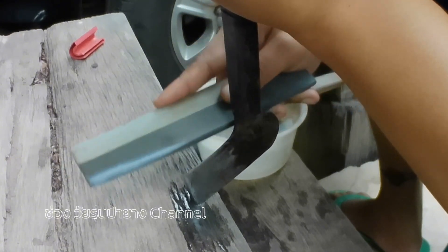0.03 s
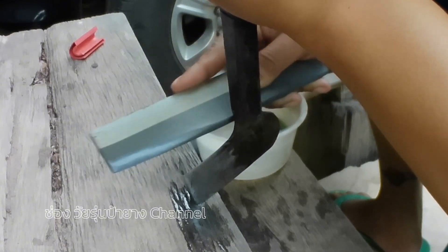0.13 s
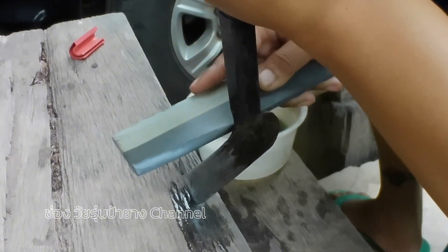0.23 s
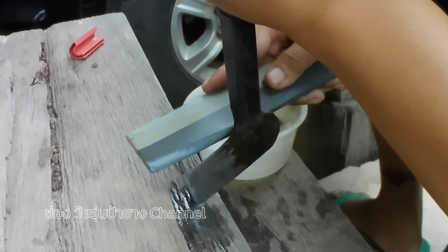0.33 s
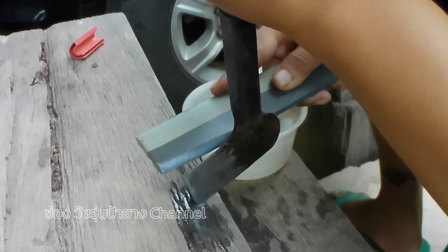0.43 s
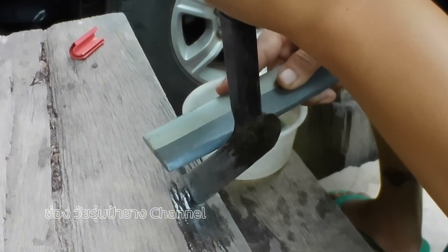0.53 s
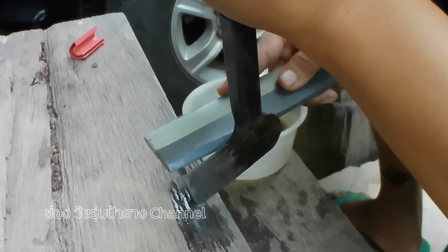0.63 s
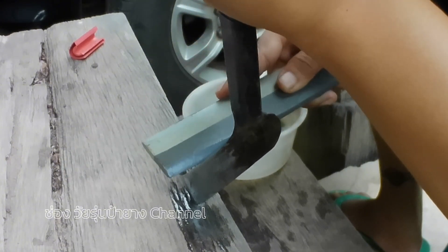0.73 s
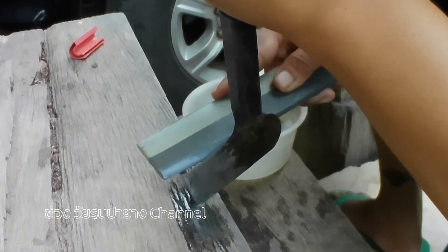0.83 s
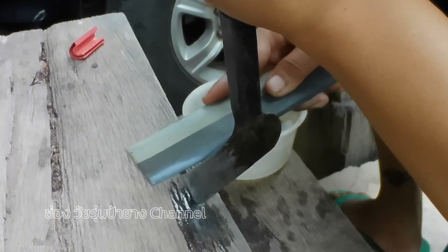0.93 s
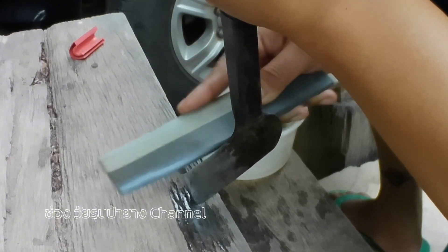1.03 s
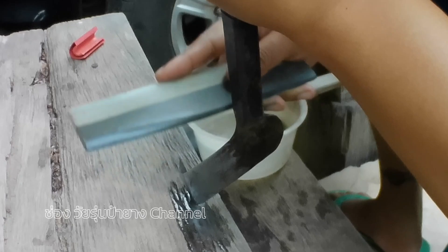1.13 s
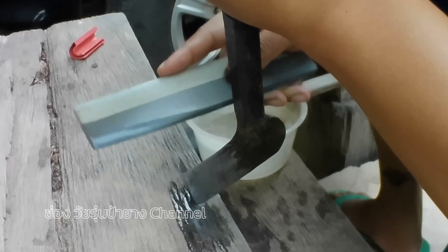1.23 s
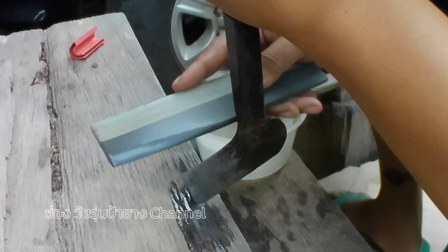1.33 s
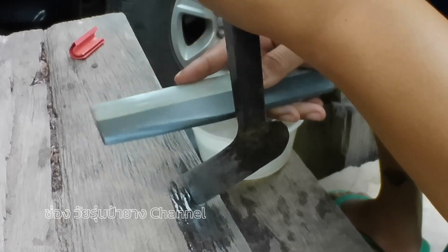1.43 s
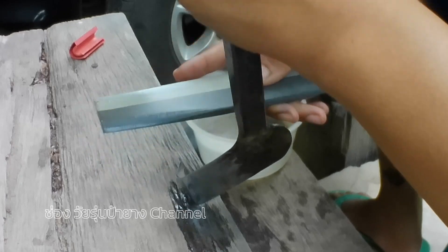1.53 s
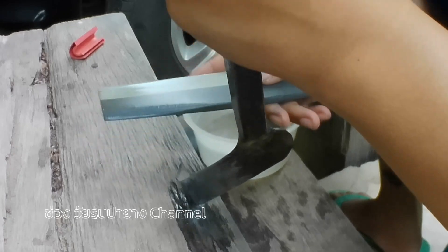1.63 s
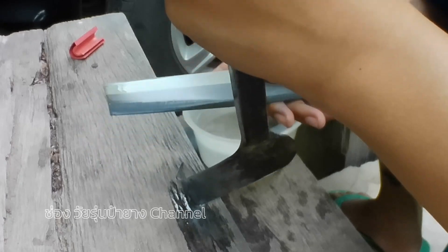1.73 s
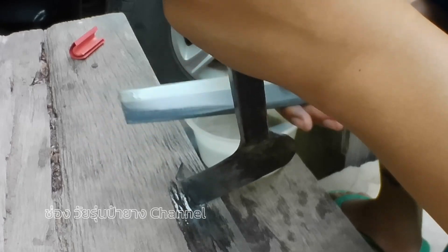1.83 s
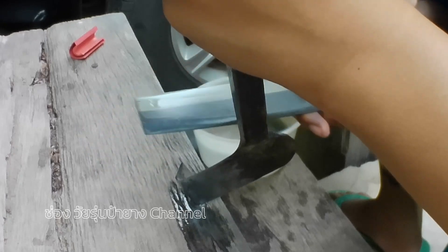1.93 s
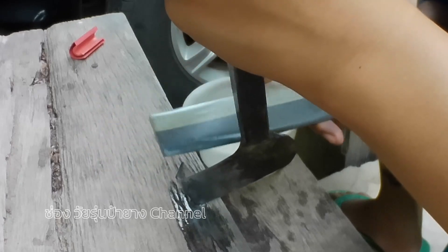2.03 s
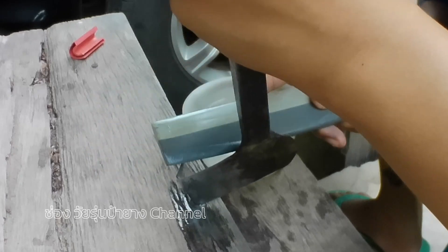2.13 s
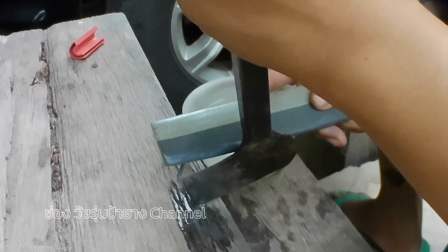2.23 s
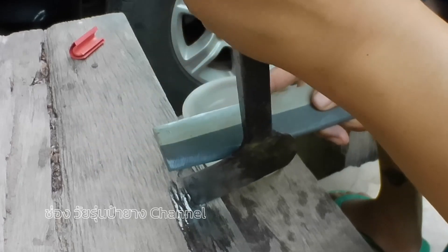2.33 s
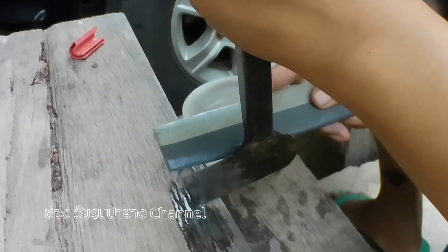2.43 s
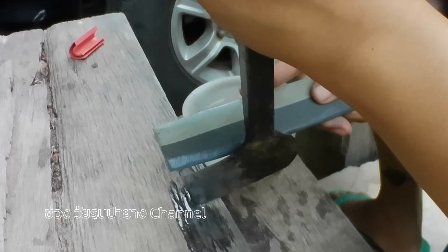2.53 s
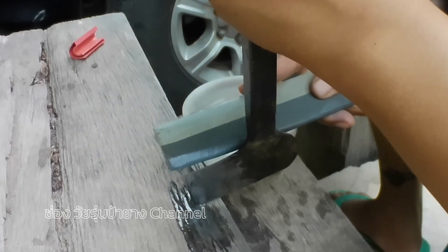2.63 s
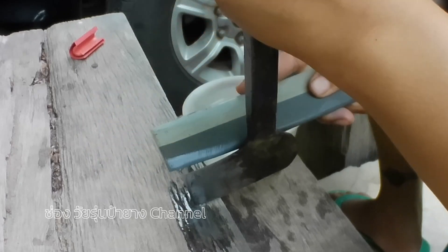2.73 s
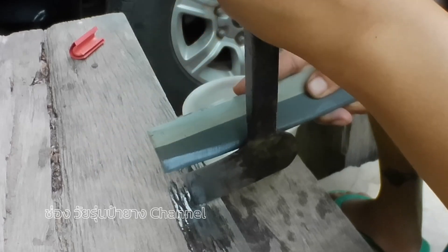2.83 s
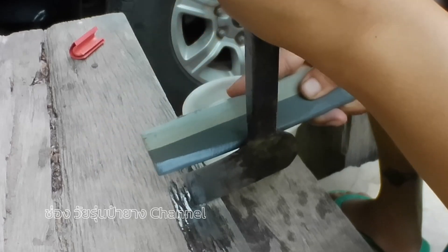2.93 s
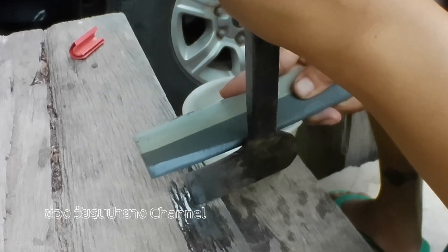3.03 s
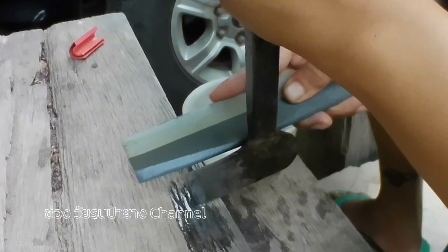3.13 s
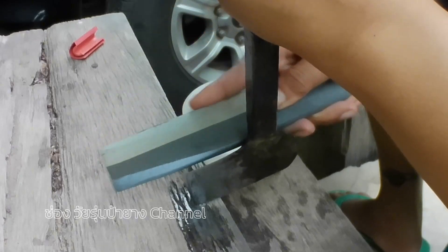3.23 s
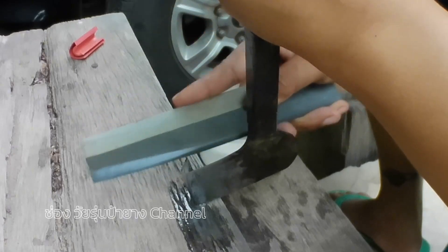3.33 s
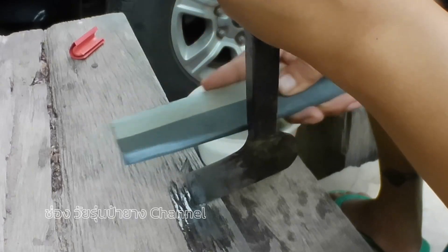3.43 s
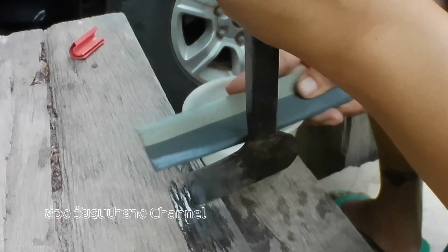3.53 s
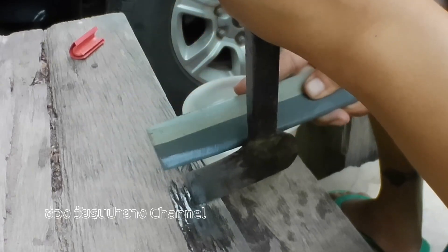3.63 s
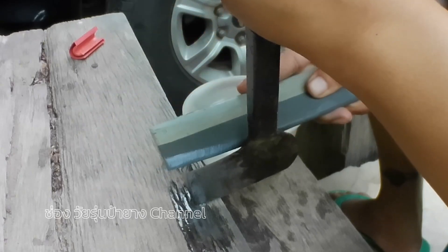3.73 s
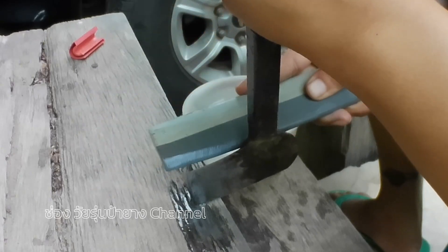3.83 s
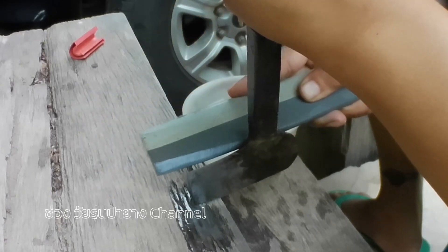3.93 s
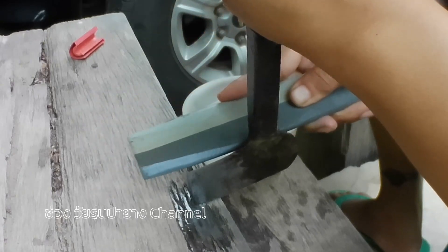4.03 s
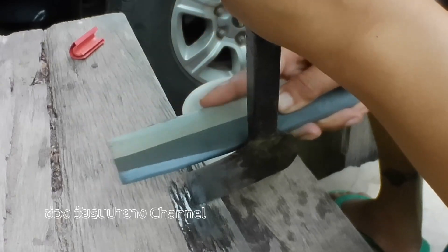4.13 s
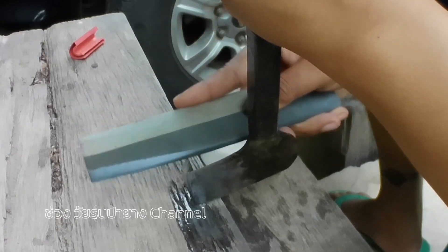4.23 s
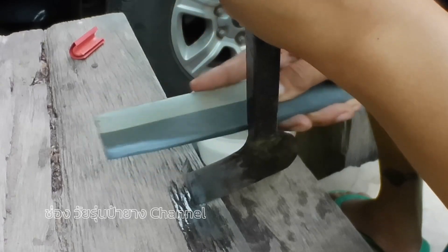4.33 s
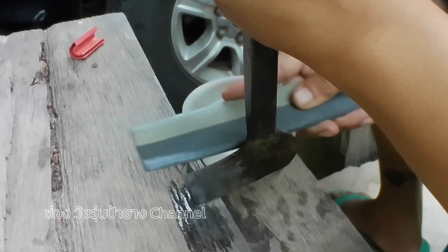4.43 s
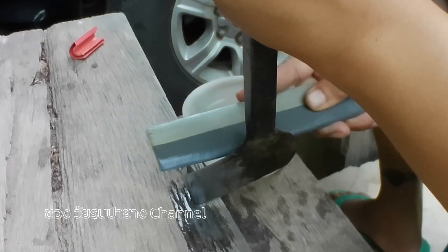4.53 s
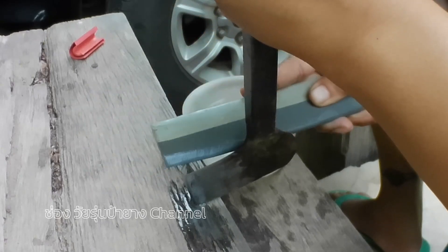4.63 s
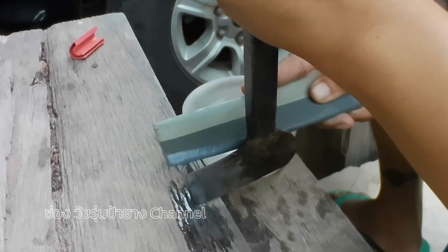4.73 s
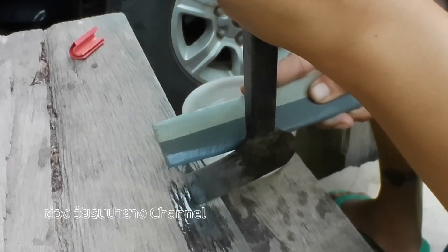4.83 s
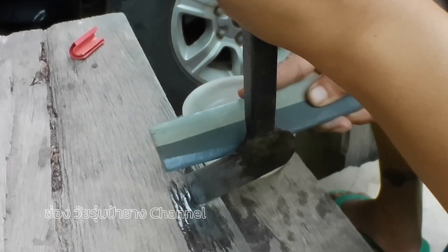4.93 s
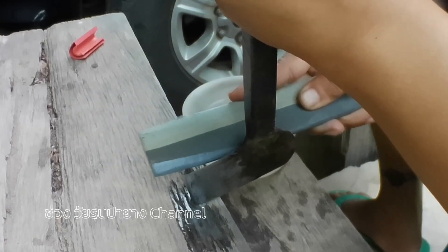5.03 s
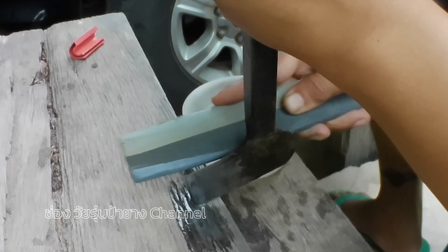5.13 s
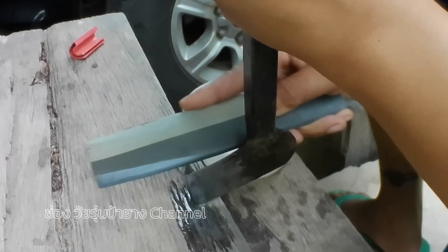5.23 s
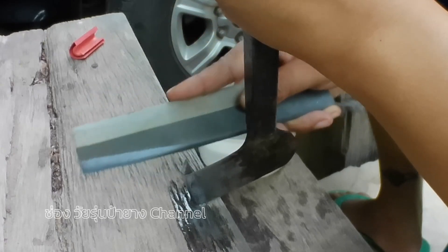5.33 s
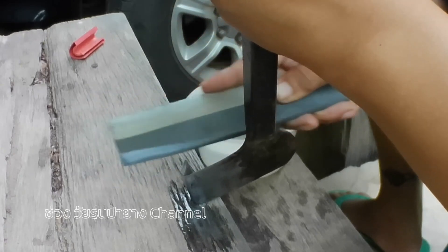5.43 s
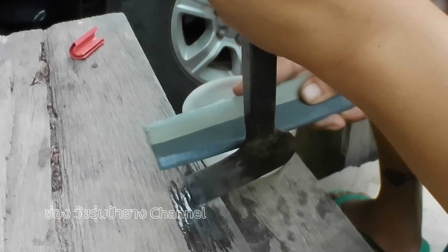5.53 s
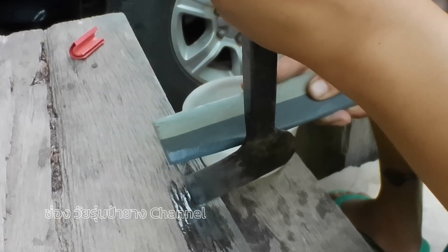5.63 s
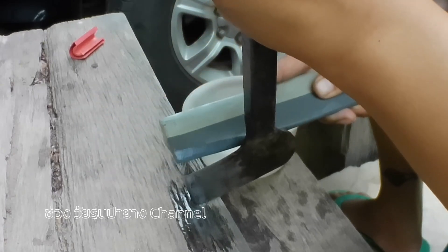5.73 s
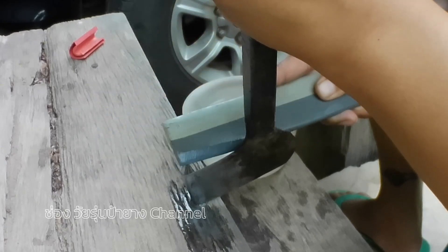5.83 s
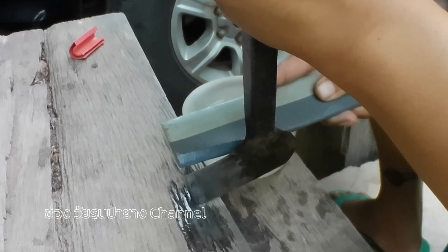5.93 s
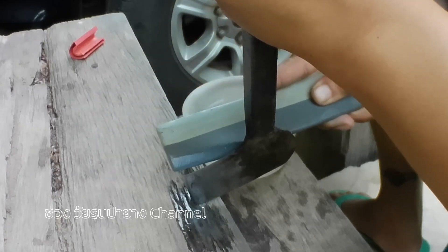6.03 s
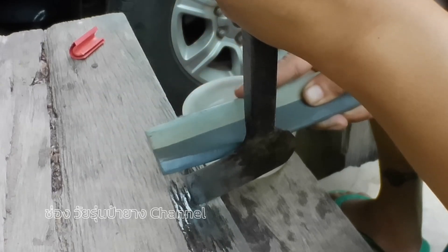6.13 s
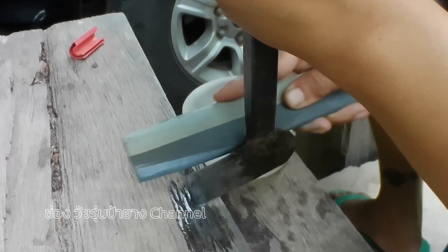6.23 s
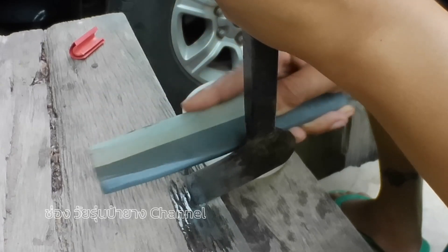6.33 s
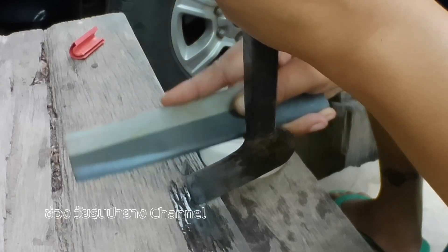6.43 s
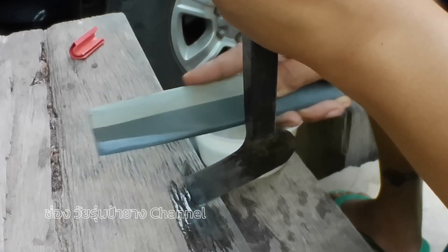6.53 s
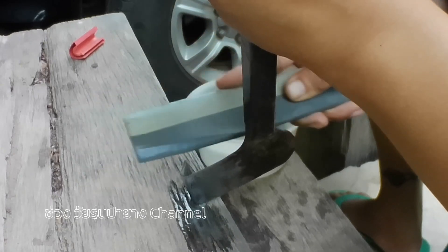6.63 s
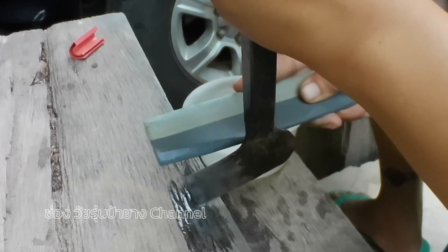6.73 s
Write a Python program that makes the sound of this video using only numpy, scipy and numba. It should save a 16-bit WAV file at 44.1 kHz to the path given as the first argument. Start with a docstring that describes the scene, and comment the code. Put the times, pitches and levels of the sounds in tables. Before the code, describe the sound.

Close, bright scraping of whetstone on steel, long pushes alternating with lighter pulls and sharp taps, over quiet outdoor rumble and motor hum.

```python
"""A wet whetstone works along a steel blade over a wooden bench: a push is under way at the start, then
pulls and pushes take turns. Grit ticks excite the modes of blade and stone; knocks ring them as stone meets
blade, and stick-slip makes a squeak early in the second, fifth and sixth pushes. Low thuds are windowed sines.
Throughout, a motor hums in wavering sine lines over distant outdoor noise, built from filtered bands,
and a faint insect, a narrow band of noise that comes and goes."""
import sys
import numpy as np
from scipy import signal
from scipy.io import wavfile
from scipy.ndimage import uniform_filter1d
from numba import njit

SR = 44100
rng = np.random.default_rng(int(sys.argv[2]) if len(sys.argv) > 2 else 0)


def to_wav(s):
    """Save 16-bit WAV."""
    ch = np.atleast_2d(s).T  # columns
    pcm = np.round(np.clip(ch, -1, 1) * 32767)  # PCM
    wavfile.write(sys.argv[1], SR, pcm.astype(np.int16))


N = 299439
T = np.arange(N) / SR


def undb(db):
    """Level: decibels to amplitude ratio."""
    return 10 ** (np.asarray(db) / 20)


def unit(x):
    """Normalisation to unit root-mean-square amplitude."""
    return x / np.sqrt(np.mean(x ** 2))


@njit
def svf(x, hz, width):
    """Resonance: a state-variable band-pass with gain 1 at the centre; width [Hz] sets its damping."""
    y, band, low = np.empty(len(x)), 0., 0.
    g = np.tan(np.pi * hz / SR)
    damping = 2 * np.pi * width / SR / np.sin(2 * np.pi * hz / SR)
    for i in range(len(x)):
        v = (band + g * (x[i] + 1e-18 - low)) / (1 + g * (g + damping))
        band, low = 2 * v - band, low + 2 * g * v
        y[i] = damping * v
    return y


def walk(rate):
    """Slow random modulation: levels held 1 / rate s and slewed twice, with spread near 1."""
    hold = int(SR / rate)
    steps = np.repeat(rng.standard_normal(N // hold + 1), hold)
    return 1.307 * uniform_filter1d(uniform_filter1d(steps, hold), hold)[:N]


def lay(tables):
    """Linear interpolation of table columns on the time axis, with a gate that is open inside each table."""
    rows = np.concatenate(tables)
    gate = sum((T >= t[0][0]) & (T <= t[-1][0]) for t in tables)
    return np.clip(gate, 0, 1), [np.interp(T, rows[:, 0], column) for column in rows.T[1:]]


def grit(scatter_db, judder_db):
    """Random excitation: dense ticks of grain on steel at three spots, which judder together."""
    size = np.minimum(rng.exponential(size=(3, N)), 5)
    ticks = rng.standard_normal((3, N)) * undb(scatter_db * size)
    judder = undb(judder_db * walk(60) + 1.31 * judder_db * walk(400))
    return unit(ticks * judder)


def colour_db(hz, mode_db, ring_db, sing_db, body_db, bench_db, stone_db, speed_db):
    """Modal coupling: grip sets how low resonances speak; a fast stroke tilts the top modes up."""
    if 350 < hz < 450:
        return bench_db
    if 450 < hz < 650:
        return stone_db
    if 1080 < hz < 1180:
        return sing_db
    if 3600 < hz < 3900:
        return mode_db
    if hz < 2200:
        return body_db * np.clip(np.log(2400 / hz) / np.log(1.7), 0, 1)
    tilt = np.clip(np.log(hz / 5500) / np.log(1.9), 0, 1)
    return ring_db * (5000 < hz < 7000) + (speed_db + 6.5) * tilt


# modes of blade and stone:
# (frequency [Hz], width [Hz], pushed level [relative dB], pulled level [relative dB])
BLADE_MODES = [(160, 80, -14, -14), (300, 50, -16, -12), (405, 16, 6, 4), (503, 25, 2, 0), (548, 30, 0, 2),
               (870, 60, -12, -14), (985, 20, -4, -8), (1015, 45, -12, -3), (1130, 30, 3, 0),
               (1220, 50, -8, -2), (1425, 45, -11, -10), (1890, 54, -18, -9), (2000, 70, -10, -16),
               (2500, 40, -13, -5), (2635, 60, -9, -10), (3350, 60, -24, -16), (3740, 80, -12, -14),
               (4400, 70, -22, -14), (4870, 100, -20, -12), (5445, 55, -7, -5), (6020, 65, -17, -6),
               (6770, 100, -12, -5), (7450, 150, -22, -18), (8250, 250, -27, -22), (10000, 450, -20, -19),
               (11080, 80, -16, -20), (12050, 70, -16, -10), (13150, 200, -26, -21), (14000, 130, -23, -25),
               (14700, 100, -28, -26), (15550, 140, -25, -28)]
# broad hiss of the grit itself: (centre [Hz], width [Hz], level [relative dB])
GRIT_RASP = [(155, 85, -15.5), (650, 200, -18), (1950, 810, -31.5), (4580, 810, -31.5), (12700, 3400, -34)]
# free end of the blade and the bench, undamped by the stone:
# (frequency [Hz], width [Hz], level [relative dB])
FREE_MODES = [(329, 4.9, -7.5), (444, 5.5, -6.5), (573.7, 30, -4), (1060, 6.2, -16.5), (1380, 19, -16),
              (1937, 8.6, -16), (2390, 5.6, -29), (3230, 10, -41), (5470, 24, -15), (5990, 24, -13)]
# short swells (+) and dips (-) of the rubbing pressure: (centre time [s], length [s], pressure change [dB])
PRESSURE_SWELLS = [(0.749, 0.042, 11), (.82, .016, -12), (.89, .05, -5), (.915, .012, 6), (2.755, .016, 5),
                   (2.851, 0.018, -5.5), (3.07, .14, -4), (3.167, 0.0093, 5.5), (3.28, .02, 4),
                   (3.838, .035, -12), (3.89, .05, 2), (3.99, .03, 4), (4.55, .13, 10), (4.763, 0.025, 3),
                   (4.942, .03, 7), (5.24, .04, 4)]
# stick-slip squeaks: (start [s], length [s], then first and last of each:
#   slip rate [Hz, Hz], level [relative dB, dB], roughness [0-1, 0-1],
#   first partial [dB, dB], second partial [dB, dB])
STICK_SLIPS = [(.662, .102, 388, 375.3, -35, -38, .15, .55, 3.5, 7, 4, -4),
               (4.887, 0.063, 384.7, 450, -35, -33.5, 0.06, 0.1, 6, -9, 5, 14),
               (5.94, 0.1147, 377.7, 445, -42, -49, .08, .15, 9, 22, 6, 15)]
SQUEAK_HUSH_DB = -5  # a squeaking stone stirs the low modes less with its grit
GAP_HZ = 8700  # parts the low family of modes from the top one


def strokes(tables, column, drive):
    """Forced vibration: grit under pressure rings the blade; where the stone sits decides which modes speak."""
    gate, (pressure_db, speed_db, *grip_db) = lay(tables)
    for centre, length, db in PRESSURE_SWELLS:
        pressure_db = pressure_db + db * np.exp(-(2 * (T - centre) / length) ** 2)
    squeaking = 1. * sum((T > s) & (T < s + length) for s, length, *_ in STICK_SLIPS)
    hush_db = SQUEAK_HUSH_DB * uniform_filter1d(squeaking, size=600)
    # singing, body, bench and stone modes
    grip_db[2:] = [db + hush_db for db in grip_db[2:]]
    force = drive * uniform_filter1d(gate * undb(pressure_db + 23.5), size=40)
    low, top = 0, 0
    modes = [(m[0], m[1], m[column]) for m in BLADE_MODES] + list(GRIT_RASP)
    for k, (hz, width, db) in enumerate(modes):
        # the contact wanders, so each mode swells and fades a little
        gain = undb(db + colour_db(hz, *grip_db, speed_db) + 2.0 * walk(7))
        # neighbouring modes take different spots; the sign alternates every three
        ring = (-1) ** (k // 3) * svf(force[k % 3] * gain, 1. * hz, 1. * width)
        if hz < GAP_HZ:
            low = low + ring
        else:
            top = top + ring
    low = low + sum(undb(db) * svf(force[0], 1. * hz, 1. * width) for hz, width, db in FREE_MODES)
    # little is radiated in the gap between the two families of modes
    below_gap = signal.butter(4, GAP_HZ - 900, fs=SR, output="sos")
    above_gap = signal.butter(4, GAP_HZ + 600, "high", fs=SR, output="sos")
    return signal.sosfilt(below_gap, low) + signal.sosfilt(above_gap, top)


# pushes: (start [s], bite [s], singing fades [s], full pressure [s], lift [s],
#   pressure at bite, full and lift [relative dB x 3], first and full treble [relative dB x 2],
#   3.7 kHz mode [dB], 5-7 kHz modes [dB], singing mode early and late [dB x 2],
#   then at bite and at full pressure: body [dB x 2], bench [dB x 2], stone [dB x 2])
PUSH_STROKES = [(-.4, -.38, -.3, -.2, -.015, -45, -44, -44, -8, -6, 2, 0, -10, -10, 8, 9, 0, 3, 5, 2),
                (.66, .68, .88, .995, 1.048, -49, -34, -32, -26, -12, -5, 1, 2.5, -14, 4, 0.5, 4, -10, -4, -7),
                (2.68, 2.695, 3.0, 3.2, 3.296, -49, -31, -30, -18, -11, 0, 1, 9, -7, 6, 1, -26, -9, -6, -5),
                (3.803, 3.818, 3.93, 4.19, 4.255, -46, -32, -31, -16, -9, -1, 0, 14, -8, 7, 2, -6.5, -9, 2, -7),
                (4.829, 4.89, 5.03, 5.22, 5.322, -46.5, -32, -32, -32, -8, 3, -2, 6.5, -8, 7, -1, 0, 3, 2, 1),
                (5.934, 5.96, 6.1, 6.28, 6.44, -46, -32, -34, -22, -8, 4, 0, 3, -3, 6, 1, 6, -3, -2, 3)]
# change as the stone lifts, when the lowest modes linger, one value [dB] each for:
# (3.7 kHz mode, 5-7 kHz modes, singing mode, body, bench, stone)
LIFT_LINGER_DB = np.array([0, 0, -3, 3, 8, 8])
TOUCH_DB = -25.5  # first touch, below the pressure that follows
LIFT_S, LIFT_DB, TRAIL_S, TRAIL_DB = .04, -27, .04, -12  # the stone leaves the edge, then trails off
BRIGHTEN_S, STILL_DULL_DB = .1, -3  # treble comes up fast with the speed, the rest of the way slowly
SING_FADE_S = .1


def push(start, bite, fades, full, lift, first_db, full_db, lift_db, first_treble, treble,
         mode_db, ring_db, early_db, late_db, *low):
    """Contact loading: bite, steady build-up, hold and quick lift; the modes shift as the stone travels."""
    off, end = lift + LIFT_S, lift + LIFT_S + TRAIL_S
    t = np.sort([start, bite, bite + BRIGHTEN_S, fades, fades + SING_FADE_S, full, lift, off, end])
    off_db = lift_db + LIFT_DB
    pressure = np.interp(t, [start, bite, full, lift, off, end],
                         [first_db + TOUCH_DB, first_db, full_db, lift_db, off_db, off_db + TRAIL_DB])
    speed = np.interp(t, [bite, bite + BRIGHTEN_S, full], [first_treble, treble + STILL_DULL_DB, treble])
    singing = np.interp(t, [fades, fades + SING_FADE_S], [early_db, late_db])
    modes = [mode_db + 0 * t, ring_db + 0 * t, singing]
    modes += [np.interp(t, [bite, full], pair) for pair in np.reshape(low, (3, 2))]
    modes = np.array(modes) + np.outer(LIFT_LINGER_DB, np.interp(t, [lift, off], [0, 1]))
    return np.column_stack([t, pressure, speed, *modes])


# pulls and light touches: (landing [s], lift [s], silent [s], first and last pressure [relative dB x 2],
#   treble [relative dB], 3.7 kHz mode [dB], 5-7 kHz modes [dB], singing mode [dB],
#   body [dB], bench [dB], stone [dB])
PULL_STROKES = [(.471, .595, .65, -46, -47, -23, 0, 0, -5, 9.5, -18, -4),
                (2.39, 2.396, 2.43, -52, -52, -23, 3, 0, 12.5, 12, 6.5, 4),
                (3.61, 3.73, 3.79, -46, -50, -20, 3, 0, 8, 12.5, 0, 5.5),
                (4.523, 4.785, 4.825, -53, -49, -22, 0, 0, 3, 7, -5.5, -4.5),
                (5.566, 5.625, 5.70, -37, -40.5, -18, 2, 0, 4, 3.5, -12, -2),
                (5.848, 5.852, 5.89, -45, -48, -34, 3, 0, 6, 14, -4, 5.5),
                (6.761, 6.8, 6.85, -40, -44, -8, 3, 0, 4, 4, -10, -12)]
LAND_S, FADE_DB = .002, -30.5  # rise of a landing; drop at the end of a pull


def pull(land, lift, silent, first_db, last_db, treble, *tone):
    """Contact loading: the stone lands at once, drags lightly and fades off the edge."""
    return [(land - LAND_S, first_db + TOUCH_DB, treble, *tone),
            (land, first_db, treble, *tone),
            (lift, last_db, treble, *tone),
            (silent, last_db + FADE_DB, treble, *np.add(tone, LIFT_LINGER_DB))]


# stone meets blade: (onset [s], peak level [dB], treble [relative dB])
STONE_KNOCKS = [(0.47, -31.5, -23), (2.385, -46, -2), (2.693, -39, -25), (2.783, -34, -16),
                (2.864, -33, -16), (3.609, -16.5, -20), (3.819, -40, -26), (4.521, -22, -18),
                (4.732, -32, -24), (5.226, -16.5, -11), (5.565, -25, -6), (5.847, -25.5, -21),
                (6.76, -25.5, -1)]


def knocks():
    """Impulse response: a short hard push and a crack of grit ring the same modes, damped by the hand."""
    out = np.zeros(N)
    t = np.arange(6000) / SR
    for onset, peak_db, treble_db in STONE_KNOCKS:
        crack = np.exp(-t / 0.0016) * rng.standard_normal(len(t)) * np.minimum(t / 0.00062, 1)
        blow = 4 * np.exp(-((t - .0015) / 0.0001) ** 2) + crack
        ring = 0
        for k, (hz, width, _, db) in enumerate(BLADE_MODES):
            level_db = db + (treble_db + 26.5) * (hz > 3000) - 10.8 * (hz < 650) - 16 * (hz > 7200)
            # doubled width: the hand's damping
            ring = ring + (-1) ** k * undb(level_db) * svf(blow, 1. * hz, 2.0 * width)
        i = int(onset * SR)
        out[i:i + len(t)] += (undb(peak_db) * ring / np.abs(ring).max())[:N - i]
    return out


SETTLE_S, SETTLE_SHARP, SETTLE_DB = 0.0201, .13, -21  # starts sharp (fraction of the slip rate) and soft
BREAK_S, BREAK_DB = .022, -25


def squeak(start, length, *pairs):
    """Stick-slip onset and release: the slip rate starts sharp, settles and glides; the level breaks off."""
    (hz, db, *first), (end_hz, end_db, *last) = pairs[0::2], pairs[1::2]
    end = start + length
    return [(start, hz * (1 + SETTLE_SHARP), db + SETTLE_DB, *first),
            (start + SETTLE_S, hz, db, *first),
            (end, end_hz, end_db, *last),
            (end + BREAK_S, end_hz, end_db + BREAK_DB, *last)]


# resonances that colour a squeak, each passed twice:
# (frequency [Hz], width of one pass [Hz], level [relative dB])
SQUEAK_MODES = [(370, 137, -2), (800, 124, -3), (1208, 285, 8.5), (1550, 580, -8), (2000, 190, -11)]


def squeaks():
    """Stick-slip: the wet stone sticks and slips nearly periodically; its harmonics ring the blade."""
    gate, (hz, db, rough, first_db, second_db) = lay([squeak(*row) for row in STICK_SLIPS])
    phase = 2 * np.pi * np.cumsum(hz * (1 + .1 * rough * walk(300))) / SR
    slips = undb(first_db) * np.cos(phase) + undb(second_db) * np.cos(2 * phase)
    slips = slips + sum(np.cos(k * phase) for k in range(3, 8))
    slips = slips * undb((1.5 + 8 * rough) * walk(250))
    ring = 0
    for f, width, mode_db in SQUEAK_MODES:
        once = svf(slips, 1. * f, 1. * width)
        ring = ring + undb(mode_db) * svf(once, 1. * f, 1. * width)
    return np.sqrt(2) * ring * gate * undb(db)


# low thuds through the bench: (centre time [s], frequency [Hz], envelope peak [dB], length [s])
BENCH_THUDS = [(0.486, 15, -43, 0.088), (0.796, 20, -29.5, 0.066), (1.702, 26, -27, 0.041),
               (3.652, 34, -30.5, 0.081), (5.29, 27, -34, 0.083), (5.975, 35, -34, .1),
               (6.097, 22, -32, 0.11)]


def thuds():
    """Heavily damped oscillation: the bench rocks briefly, a sine under a bell-shaped envelope."""
    out = np.zeros(N)
    for centre, hz, db, length in BENCH_THUDS:
        envelope = undb(db) * np.exp(-(2 * (T - centre) / length) ** 2)
        out += envelope * np.sin(2 * np.pi * hz * (T - centre))
    return out


# motor lines: (mean frequency [Hz], mean level [dB rms])
MOTOR_LINES = [(57, -42), (114.5, -61), (172, -66.5), (228, -62.5), (342, -71)]


def hum():
    """Rotational line spectrum: motor lines waver together in pitch and separately in level."""
    turn = np.cumsum(1 + 0.01208 * walk(6.6)) / SR
    out = 0
    for hz, db in MOTOR_LINES:
        level = np.sqrt(2) * undb(db + 0.46 * walk(3.29))
        out = out + level * np.sin(2 * np.pi * (hz * turn + rng.random()))
    return out


# spectrum of the distant noise: (frequency [Hz], density [relative dB per Hz])
NOISE_SPECTRUM = [(8.8, -39), (15, -8.5), (60, -15), (81, -19), (118, -17.5), (144, -26.5), (230, -30),
                  (258, -40.5), (345, -28.5), (436, -37), (825, -38), (982, -43.5), (15500, -67)]
# swells of the distant bass, 100-400 Hz: (time [s], level change [dB])
BASS_SWELLS = [(0, 0.5), (1.1, 2.5), (1.5, -1.5), (1.8, -0.5), (2.3, 1.5), (4.4, 1.5), (6.79, 1.5)]
# insect band: (time [s], level [dB])
INSECT_LEVELS = [(0, -101), (.4, -80), (1.4, -80), (1.55, -95), (1.7, -78), (2.2, -77), (2.4, -90.5),
                 (6.79, -91)]
OUTDOORS_DB = -47.5  # rms of the whole distant noise, without the insect


def outdoors():
    """Band-filtered noise: distant third-octave bands, the bass flickering most, and a thin insect band."""
    spectrum, out = np.array(NOISE_SPECTRUM), 0
    swell_db = np.interp(T, *np.transpose(BASS_SWELLS))
    for hz in 16 * 2 ** np.arange(0, 9.5, 1 / 3):
        flicker_db = (2.5 if hz < 400 else .8) * walk(5)
        db = np.interp(np.log(hz), np.log(spectrum[:, 0]), spectrum[:, 1]) + flicker_db
        db = db + swell_db * (100 < hz < 400)
        once = svf(rng.standard_normal(N), hz, hz / 3)
        out = out + undb(db) * svf(once, hz, hz / 3)
    insect = unit(svf(rng.standard_normal(N), 5050.0, 240.0))
    insect = insect * undb(np.interp(T, *np.transpose(INSECT_LEVELS)))
    return unit(out) * undb(OUTDOORS_DB) + insect


def scene():
    """Superposition: all sources add; pushes and pulls share one stream of grit."""
    drive = grit(scatter_db=2.0, judder_db=1.55)
    pushed = strokes([push(*row) for row in PUSH_STROKES], column=2, drive=drive)
    pulled = strokes([pull(*row) for row in PULL_STROKES], column=3, drive=drive)
    return (pushed + pulled + knocks() + squeaks() + thuds() + hum() + outdoors())[None]


HISS_DB = -69.5  # rms before the low-pass
TOP_HZ = 15740


def record(dry):
    """Self-noise and band limit: the microphone hisses faintly and a steep low-pass cuts the top."""
    hiss = undb(HISS_DB) * rng.standard_normal(dry.shape)
    low_pass = signal.ellip(10, .2, 80, TOP_HZ, fs=SR, output="sos")
    return signal.sosfilt(low_pass, dry + hiss)


dry = scene()
out = record(dry)
to_wav(out)
```